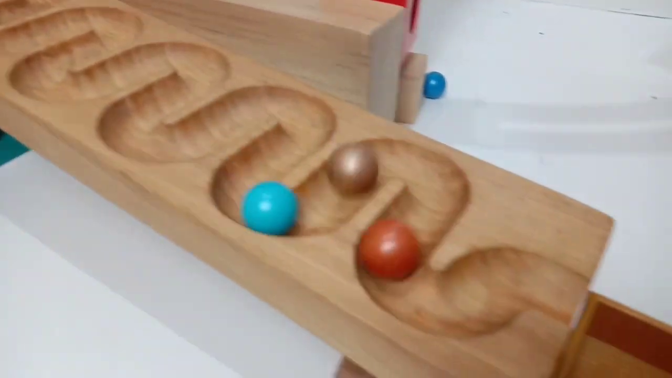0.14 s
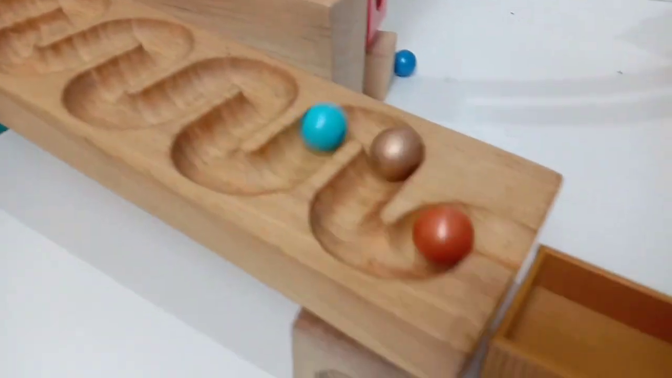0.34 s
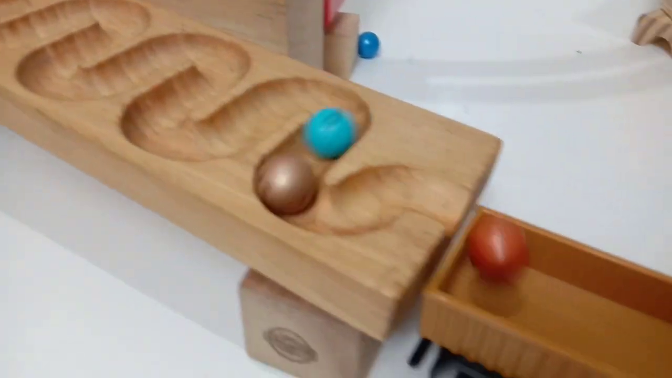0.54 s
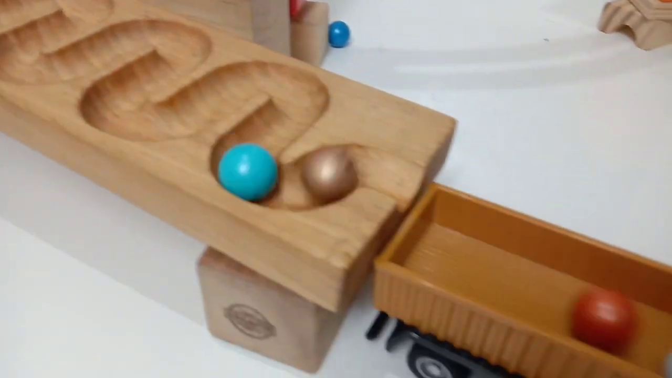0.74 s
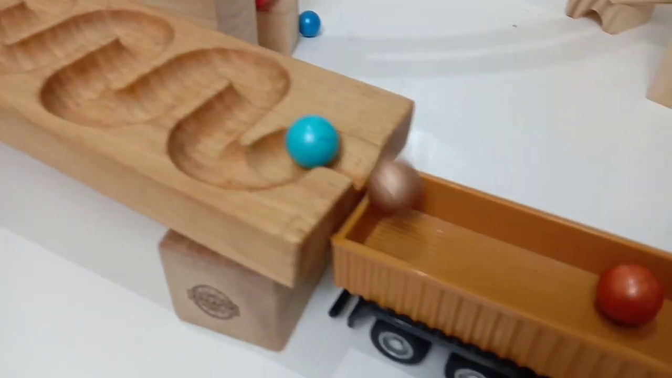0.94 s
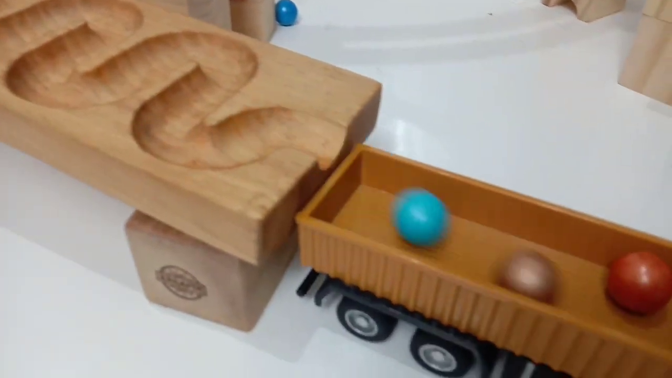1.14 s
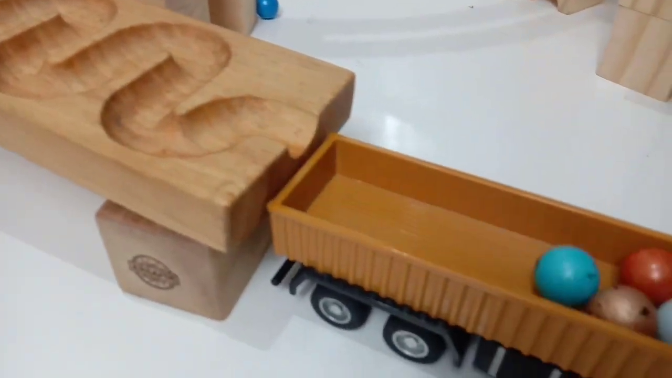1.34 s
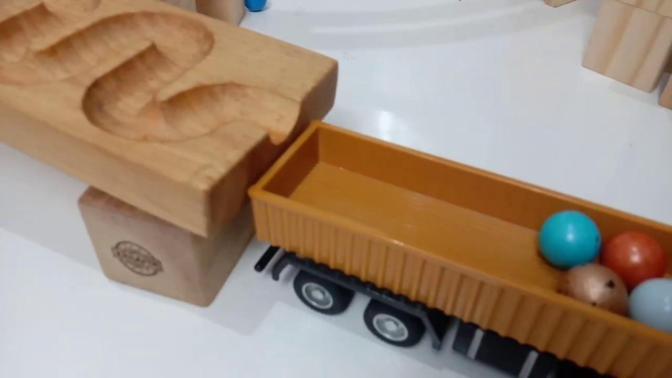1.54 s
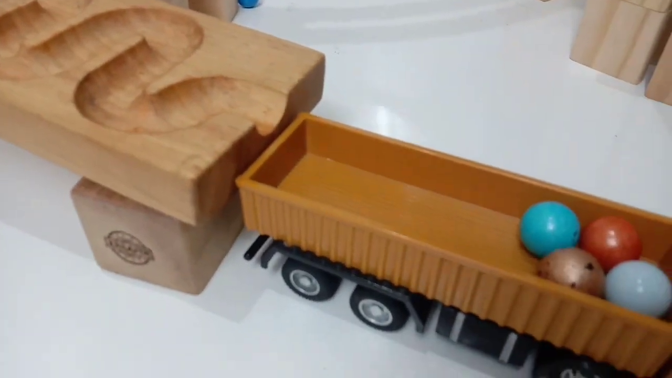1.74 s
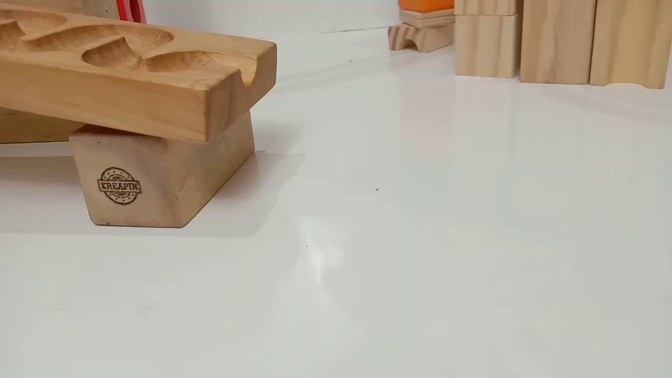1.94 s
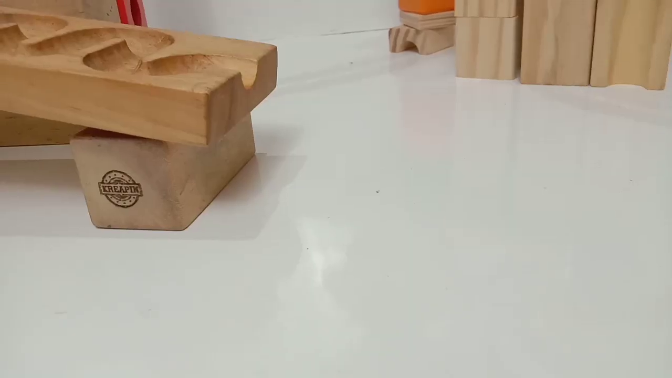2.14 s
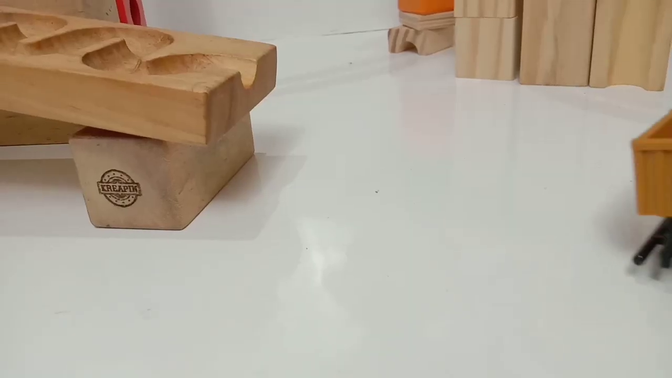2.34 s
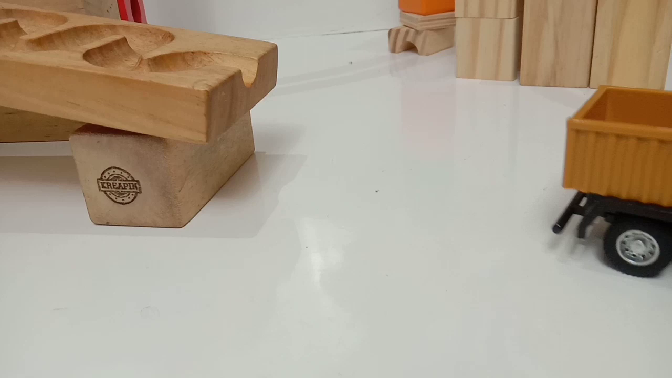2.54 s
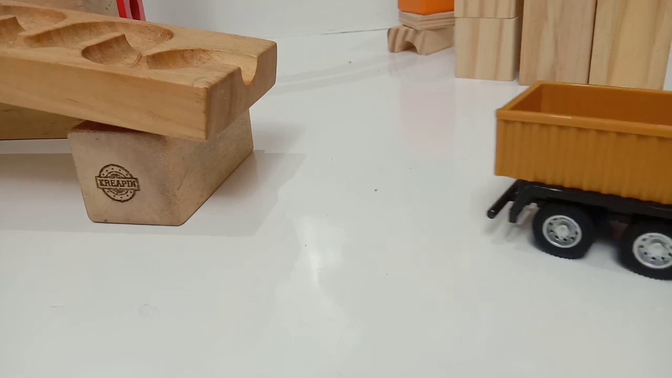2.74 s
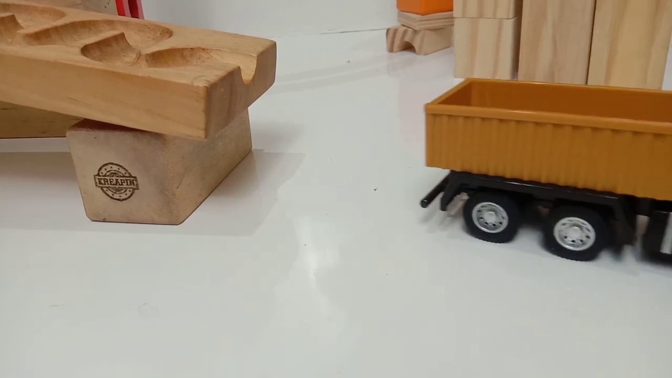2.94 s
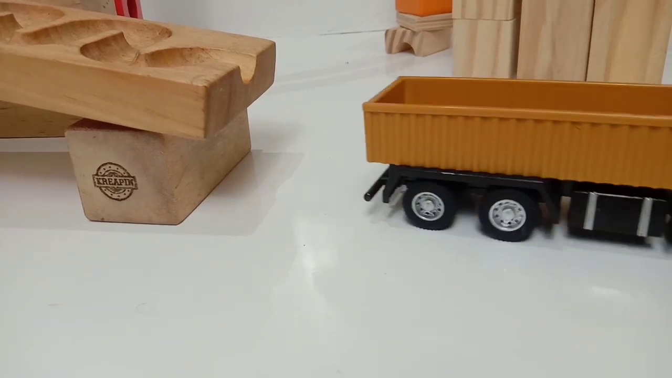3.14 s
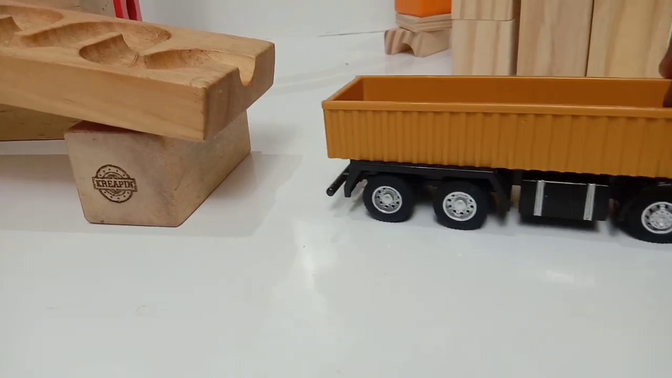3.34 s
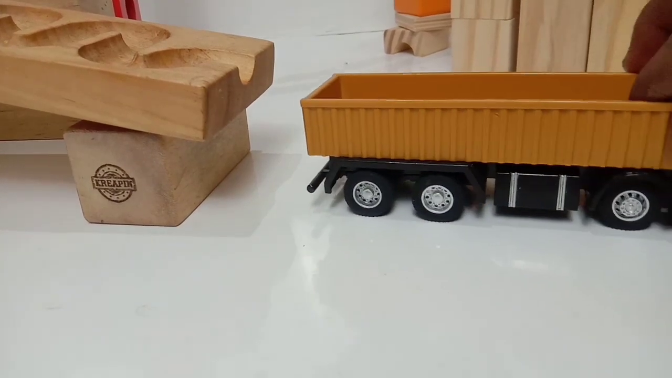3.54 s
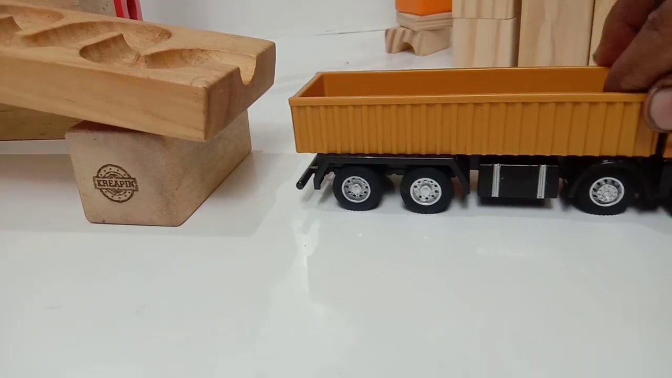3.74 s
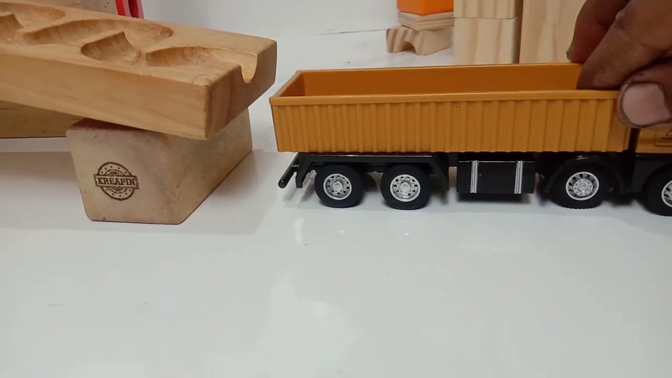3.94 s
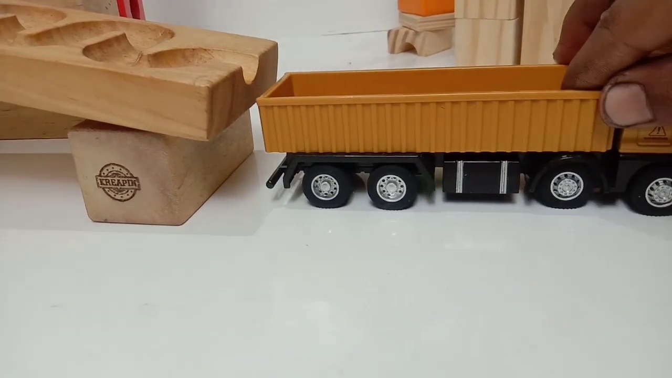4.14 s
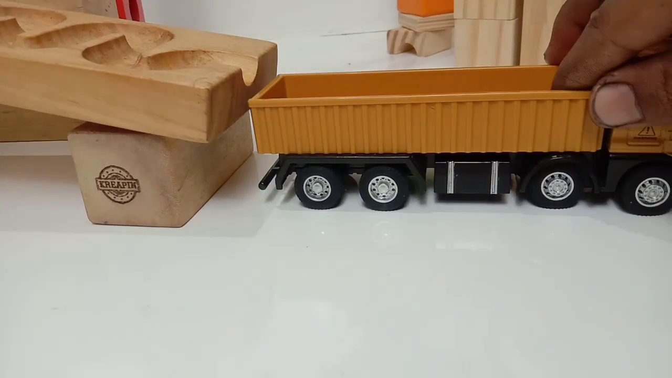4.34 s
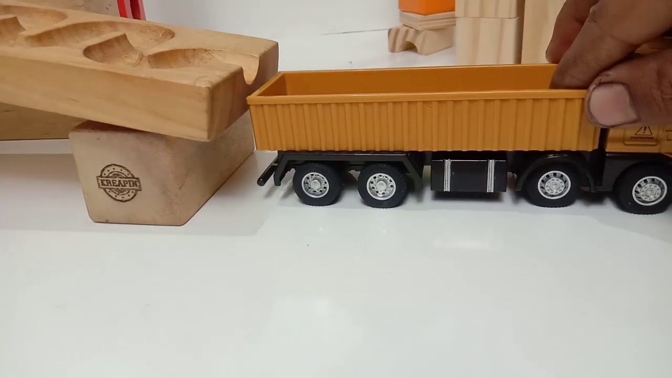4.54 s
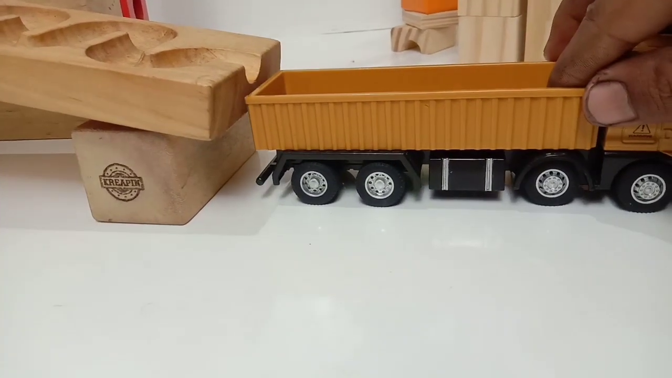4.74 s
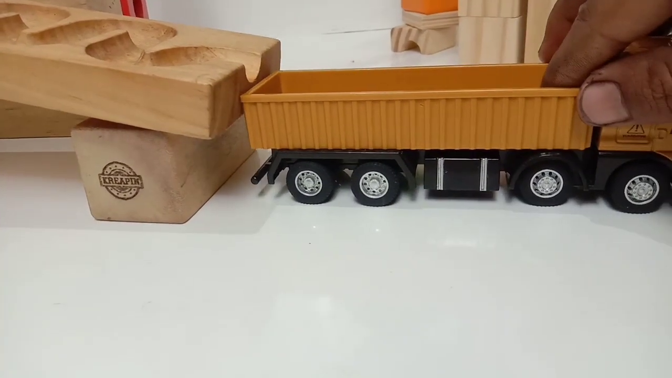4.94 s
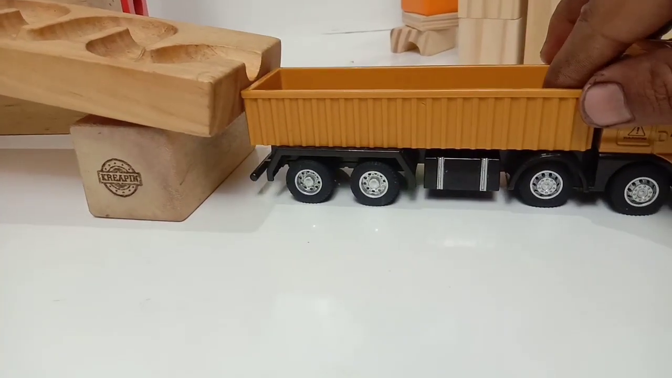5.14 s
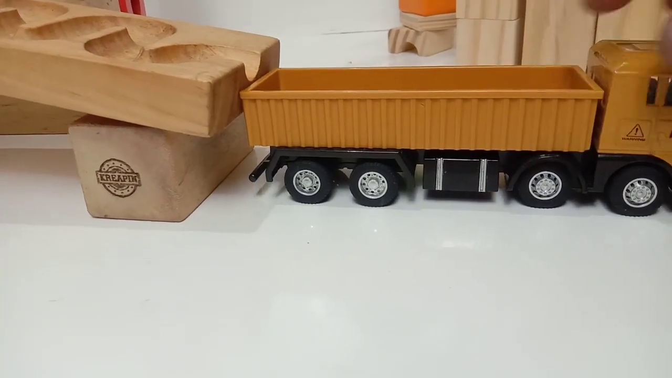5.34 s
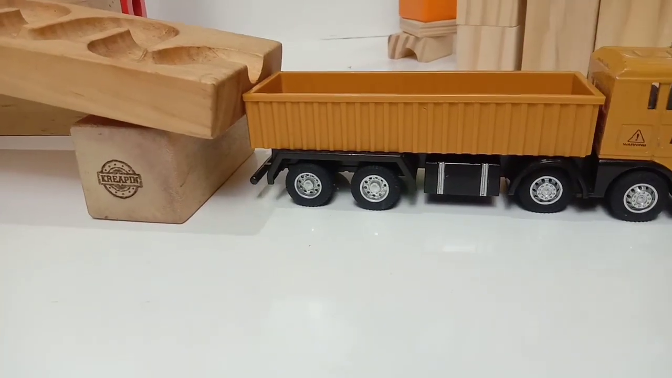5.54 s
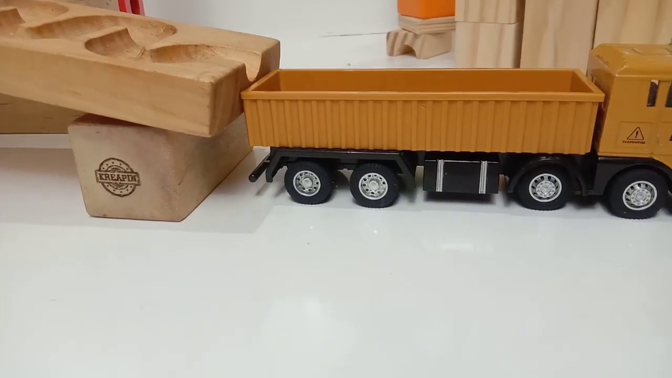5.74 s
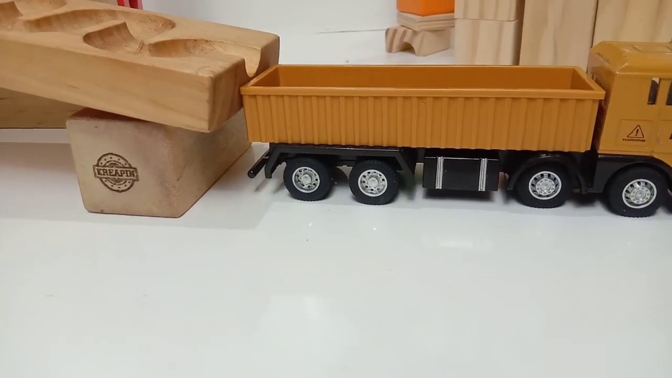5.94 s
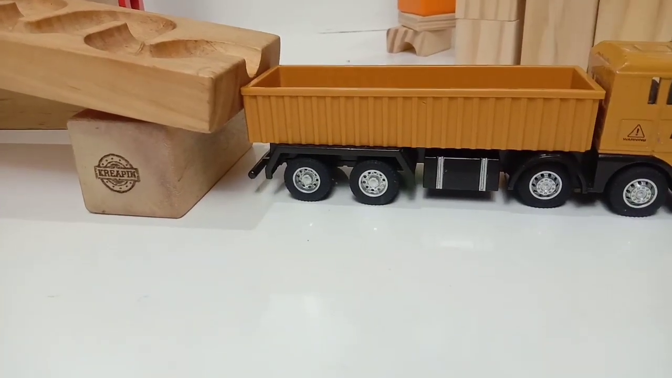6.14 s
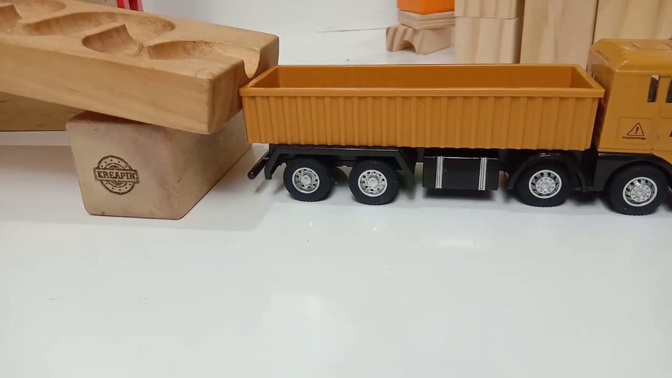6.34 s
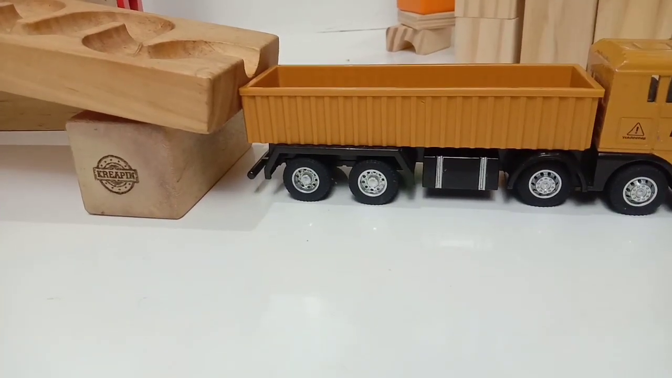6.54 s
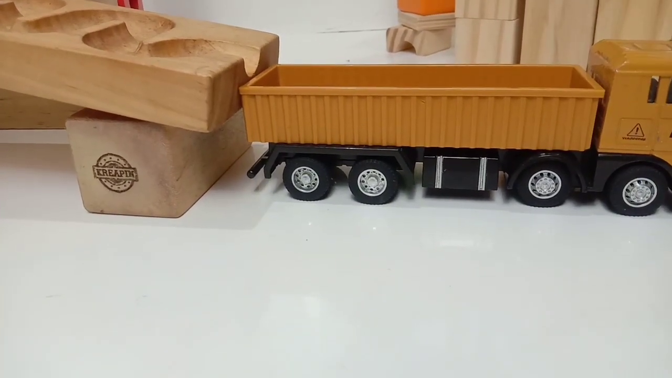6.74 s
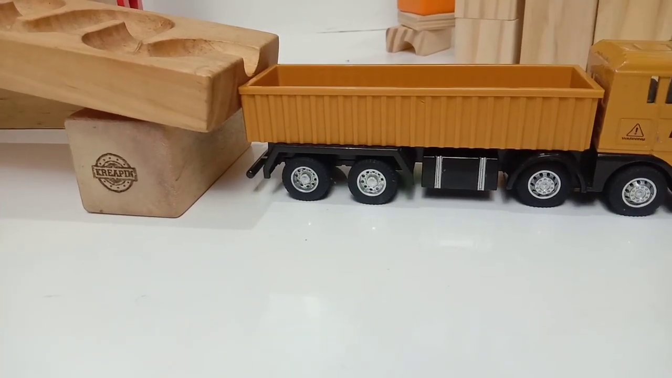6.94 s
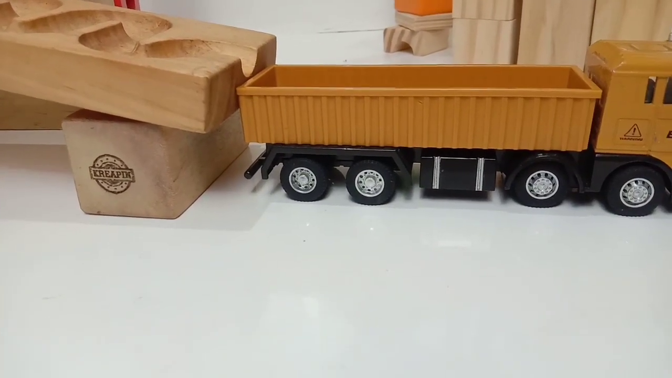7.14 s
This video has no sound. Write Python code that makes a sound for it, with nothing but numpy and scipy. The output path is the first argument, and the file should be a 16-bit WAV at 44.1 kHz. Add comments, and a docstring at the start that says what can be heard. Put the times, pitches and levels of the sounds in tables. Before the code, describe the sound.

Marbles roll down a winding wooden track with a hollow rumble and drop one after another into a plastic toy trailer, clacking and bouncing. After a short silence, the toy truck is set down on a table with rattling knocks and wheeled briefly. Faint ticks and a few dull hand bumps follow, then a quick cluster of sharp plastic clicks. The sounds are close, in a small, slightly echoing room.

```python
"""A table in a small, reverberant room. Marbles rumble down a winding wooden track, exciting the modes of the
board, and drop into the plastic trailer of a toy truck, where they ping, bounce and clack. The sound drops out
for a moment; then the truck is set down, wheeled back and handled: its loose parts rattle, and its hollow body
and the table resonate. A limiter ducks around the hardest clacks, so that their echoes swell up afterwards."""
import sys
import numpy as np
from scipy import signal
from scipy.fft import rfft, irfft, next_fast_len
from scipy.io import wavfile
from scipy.ndimage import map_coordinates

SR = 44100
rng = np.random.default_rng(int(sys.argv[2]) if len(sys.argv) > 2 else 0)


def int16_out(signal):
    """Quantize to a 16-bit WAV file."""
    q = np.round(np.clip(np.atleast_2d(signal).T, -1, 1) * 32767)
    wavfile.write(sys.argv[1], SR, q.astype(np.int16))


N = 317520

# reverberation time of the room: f/Hz, t60/s
ROOM_DECAY = [(100, 0.8), (500, 0.55), (2000, 0.28), (6000, 0.31), (9000, 0.24), (15000, 0.2)]
# spectral envelopes: f/Hz, level/dB
AIR_SPECTRUM = [(15, -67.5), (25, -35), (82, -3.5), (180, -5), (212, -7.5), (335, -13), (427, -13.5),
                (463, -15.5), (677, -27), (1020, -21.5), (1100, -20), (1440, -25.5), (3520, -29.5),
                (3920, -30.5), (16000, -44.5)]  # room hum and hiss
TYRE_SPECTRUM = [(59, -46), (100, 9), (147, -12.5), (365, -21), (406, -8), (583, -17.5), (950, -5.5),
                 (2520, -12.5), (5080, -6), (7140, -22.5), (9020, -66), (16000, -56.5)]  # tyres on the table
THUD_SPECTRUM = [(60, -34), (200, 0), (380, 3.5), (800, -10), (1400, -19.5), (3000, -32), (8000, -30.5),
                 (15000, -57.5)]  # a soft hand
SNAP_SPECTRUM = [(100, -24), (400, -9), (1200, -7.5), (2800, -5), (3700, -1), (5500, -3.5), (7400, 3.5),
                 (8800, -11.5), (11000, -18.5), (13600, -33.5), (14800, -15.5), (15500, -29)]  # plastic on plastic
CHATTER_SPECTRUM = [(100, -18.5), (400, -6), (1000, -10.5), (1700, 5.5), (2600, 1), (3800, 7.5),
                    (5500, -10), (7400, 2), (8600, -13.5), (11000, -22.5), (13800, -27.5), (15300, -12.5)]  # the shaken trailer
MARBLE_SPECTRUM = [(100, -22.5), (500, -3), (1000, -7), (1700, 2.5), (2700, -1.5), (4200, 6.5),
                   (5500, -3.5), (7400, 2.5), (8600, -12), (11000, -18.5), (13800, -21), (15300, -11)]  # a marble's hard contact
# normal modes: f/Hz, level/dB, t60/s
TABLE_MODES = [(86, -3.5, 0.42), (112.4, 0, 0.39), (135, -7.5, 0.19), (179, 2, .35), (237.4, -6.5, 0.26),
               (293, -10.5, 0.24)]  # table top
BODY_MODES = [(342, -17, 0.12), (412, -12.5, 0.13), (729, -9, 0.06), (887, -12.5, 0.056),
              (1030, -16, 0.043), (1233.6, -1.5, 0.07), (1270, -2.5, 0.11), (1370, -5.5, 0.044),
              (1640, -7.5, 0.04), (1753, -10, 0.051), (2049, -8, 0.1), (2307, -1.5, 0.013)]  # hollow truck body
CHASSIS_MODES = [(2923, -14, 0.2), (3420, 5.5, 0.063), (4640, -4.5, 0.096), (4540, 3, 0.15),
                 (5750, 1, 0.058), (6150, -4, 0.053), (6860, 2.5, 0.047), (7150, 7.5, 0.047),
                 (9200, -7, 0.048), (9600, -8, 0.025), (9770, -8.5, 0.035), (11700, -29, 0.049),
                 (14730, -19, .07)]  # chassis and steel axles
TRAILER_MODES = [(2840, -11, 0.24), (3290, 2.5, 0.054), (3660, -10, 0.083), (4000, -3.5, 0.1335),
                 (4340, 1.5, 0.13), (5660, -10, .06), (6160, -6.5, 0.03), (6860, -13.5, .12),
                 (7800, 2, 0.034), (6900, -8, .14), (7340, -11, 0.082), (10370, -28, 0.033)]  # trailer's shell
# modes of a small loose part: ratio to its pitch, level/dB, t60/s
PART_MODES = [(.66, -12, .05), (1, 5.5, 0.037), (1.38, -3, 0.051), (1.681, -10, 0.042)]
# a harder knock is a shorter contact and rings higher: level/dB, f/Hz
KNOCK_PITCH = [(-33, 3520), (-18, 5300)]
# resonances of the wooden track: f/Hz, bandwidth/Hz, level/dB
BOARD_MODES = [(192.6, 24, -7.5), (286, 84, -8), (407, 14, -1), (598.5, 170, -13), (695, 40, -0.5),
               (726, 15, -1), (796, 35, -4), (1000, 200, -16.5), (1242, 38, -5.5), (1500, 120, -12.5),
               (1629, 50, -5), (1850, 150, -16), (2678, 440, -21.5)]

# wheels and axles running on the table: t/s, level/dB
WHEEL_LEVELS = [(1.93, -90.5), (2.11, -54.5), (2.43, -51), (2.63, -54.5), (3.13, -50.5), (3.32, -71.5),
                (3.72, -67), (3.93, -83), (5.5, -86.5)]
# fingers and tyres rubbing: centre t/s, duration/s, level/dB, f/Hz, relative bandwidth
SCUFFS = [(2.954, 0.021, -50.5, 1760, 0.92), (3.715, 0.039, -58.5, 563, 1), (4.188, .1, -72.5, 610, .7),
          (4.915, 0.031, -55.5, 991, 1), (6.325, 0.073, -45.5, 368, 0.46),
          (7.012, 0.05, -64.5, 9500, 0.032)]
# a hand bumping truck and table: t/s, level/dB, relative level of the upper thud/dB
HAND_BUMPS = [(5.1, -50, -4.5), (5.265, -42, -14), (5.633, -33.5, -3), (5.655, -38.5, 2), (5.703, -38.5, 0),
              (5.97, -51.5, 0.5), (7.003, -43.5, 12.5)]
# plastic parts snapping together: t/s, level/dB, relative body level/dB, body f/Hz, top treble gain/dB
KNOCKS = [(1.923, -25.5, -17.5, 1980, -2.5), (2.067, -39, -17.5, 1310, 2.5), (2.103, -43.5, -6.5, 1410, 3),
          (2.1796, -37.5, -23, 1410, 6.5), (2.219, -14, -7.5, 1275, -3), (2.339, -43.5, 7.5, 1400, -3),
          (2.363, -19.5, -9.5, 1360, 1.5), (2.511, -14.5, -3.5, 1323, -2.5), (2.882, -45.5, -0.5, 1040, -9),
          (3.015, -34.5, -2, 1930, -5), (3.119, -24.5, -2.5, 2050, -3), (3.258, -32.5, -5.5, 1266, -13),
          (3.514, -51.5, 4, 1246, -8), (3.538, -39.5, -3, 1500, -4), (3.6, -41.5, -0.5, 1860, -11),
          (3.767, -36.5, -3, 1496, -7.5), (3.919, -66, 9, 1592, -12.5), (4.555, -60, -5, 1252, -18),
          (4.762, -55.5, 0.5, 1400, 15.5), (4.87, -44.5, -6.5, 1300, 9), (4.904, -47.5, 2.5, 1240, -9),
          (5.106, -67.5, 14, 2150, -15), (5.188, -69, 12.5, 2030, -19), (6.158, -40.5, 6, 1203, -29.5),
          (6.279, -48, 4, 1690, -12), (6.293, -31, 3, 1240, -17), (6.35, -31.5, -2.5, 1200, -6),
          (6.362, -30, -2.5, 1500, -12.5), (6.379, -27, -2.5, 1405, -6.5), (6.436, -10.5, -32.5, 1460, 1.5),
          (6.446, -27.5, 0.5, 1230, 2), (6.467, -18.5, -10.5, 1270, 2.5), (6.488, -9, -11.5, 1202, 2),
          (6.502, -22.5, -3, 1170, 3.5), (6.538, -9.5, -10.5, 1270, 3), (6.58, -33, 0.5, 1290, 1.5),
          (6.616, -23.5, -7, 2290, 6), (6.712, -43, 4, 2300, 2), (6.797, -29.5, 4, 1420, 3),
          (6.807, -18, -4, 1170, 2), (6.856, -26.5, -3, 1490, -8.5), (7.004, -46.5, 6.5, 1305, 3)]
# the truck dropping onto its wheels: t/s, level/dB, loss per rebound/dB, thump level/dB, favoured f/Hz
SETTLES = [(1.944, -35, 2, -37.5, 110), (2.232, -38.5, 9, -38, 169), (2.377, -23, 3.5, -23, 110),
           (2.545, -31.5, 6, -29.5, 130), (3.142, -26.5, 3, -27, 194), (3.609, -33.5, 19, -47.5, 200),
           (4.886, -53.5, 7, -55, 230)]
# rolling in the groove, dying away as the marbles leave it: t/s, level/dB
ROLL_LEVELS = [(0.0, -33), (0.276, -36.5), (0.452, -38), (0.872, -40), (1.14, -47), (1.222, -52),
               (1.34, -69.5), (1.642, -77), (1.75, -81)]
# marbles striking the bends: t/s, level/dB
BEND_BUMPS = [(.317, -18), (.365, -19.5), (.415, -16.5), (.426, -16.5), (.686, -21.5), (0.797, -20.5),
              (0.811, -23), (.866, -21.5), (.894, -18.5), (1.524, -36.5)]
# marbles colliding: t/s, level/dB, brightest f/Hz, relative shaking of trailer and table/dB
CLACKS = [(0.2313, -37.5, 5000, -9.5), (0.2713, -7.5, 6870, -16), (.757, -17, 7200, -27),
          (.785, -20.5, 5040, -15.5), (1.27, -24, 6130, -16), (1.274, -14.5, 6000, -13),
          (1.311, -9, 6630, -20), (1.4772, -41.5, 6430, -23.5), (1.548, -37.5, 3840, -14.5)]
# marbles falling into the trailer: landing t/s, level/dB, fall from the rim/s, first flight/s
DROPS = [(-.04, -2, .04, 0.041), (.579, 0, 0.041, .044), (.963, -1, .039, 0.044),
         (1.0973, -1, 0.039, 0.034)]

RING_S = .45  # longest ring of one blow
SILENCE_S, TOP_HZ = (1.81, 1.921), 15550


def amp(db):
    """Amplitude ratio of a level in decibels."""
    return 10 ** (np.asarray(db) / 20)


def unit(x):
    """Normalisation to rms 1."""
    return x / np.sqrt(np.mean(x ** 2) + 1e-20)


def blow(x):
    """Normalisation to the energy of 3 ms at rms 1."""
    return x / np.linalg.norm(x) * np.sqrt(.003 * SR)


def along(points, hz):
    """Interpolation of (f/Hz, value) points on a log-frequency axis."""
    f, v = np.transpose(points)
    return np.interp(np.log(hz + 1), np.log(f + 1), v)


def peak(hz, centre_hz, octaves):
    """Gaussian bell of height 1 on a log-frequency axis."""
    return np.exp(-(np.log2((hz + 1) / centre_hz) / octaves) ** 2)


def envelope(rows):
    """Amplitude envelope through (t/s, level/dB) points."""
    return amp(np.interp(np.arange(N) / SR, *np.transpose(rows)))


def wobble(rate):
    """Random modulation: a spline through `rate` knots a second."""
    knots = rng.standard_normal(int(N * rate / SR) + 4)
    return map_coordinates(knots, [np.arange(0, N, 64) * rate / SR]).repeat(64)[:N]


def age():
    """Time since a blow, t/s."""
    return np.arange(int(RING_S * SR)) / SR


def add(track, s, x):
    """Superposition of x on the track at time s, which may be negative."""
    start = round(s * SR)
    x = x[max(-start, 0):N - start]
    track[max(start, 0):][:len(x)] += x


def coloured(x, gain):
    """Minimum-phase filtering: folding the cepstrum gives a causal response of magnitude gain(f)."""
    size = 2 * next_fast_len(len(x) // 2 + 2048)
    magnitude = np.maximum(gain(np.fft.rfftfreq(size, 1 / SR)), 1e-6)
    cepstrum = irfft(np.log(magnitude))
    cepstrum[1:size // 2] *= 2
    cepstrum[size // 2 + 1:] = 0
    return irfft(rfft(x, size) * np.exp(rfft(cepstrum)))[:len(x)]


def shaped(x, spectrum):
    """Source and filter: x takes on a spectral envelope of (f/Hz, level/dB) points."""
    return coloured(x, lambda hz: amp(along(spectrum, hz)))


def burst(t60, rise=.0001):
    """Broadband transient: noise that builds up and decays exponentially."""
    t = age()
    return blow(rng.standard_normal(len(t)) * amp(-60 * t / t60) * (1 - np.exp(-t / rise)))


def ring(modes, scatter_db=0):
    """Free vibration: a sum of damped modes with random signs and scattered strengths."""
    t = age()
    hz, db, t60 = np.transpose(modes)[:, :, None]
    strength = amp(db + scatter_db * rng.standard_normal(db.shape)) * rng.choice([-1, 1], db.shape)
    return blow(np.sum(strength * amp(-60 * t / t60) * np.sin(2 * np.pi * hz * t), axis=0))


def grains(rate, spread_db):
    """Poisson process: tiny impacts of uneven size, on average `rate` a second."""
    impulses = (rng.random(N) < rate / SR) * rng.choice([-1, 1], N)
    return impulses * amp(spread_db * np.clip(rng.standard_normal(N), -2, 2))


def in_room(x, wet_db):
    """Reverberation: a diffuse tail in which each frequency decays at its own rate."""
    t = age()
    hz, s, noise = signal.stft(rng.standard_normal(len(t)), SR, nperseg=256)
    decay = amp(-60 * s / along(ROOM_DECAY, hz)[:, None])
    tail = signal.istft(noise * decay, SR, nperseg=256)[1][:len(t)]
    tail *= 1 - np.exp(-t / 0.0056)  # the walls take a moment to answer
    return x + amp(wet_db) * signal.fftconvolve(x, tail / np.linalg.norm(tail))[:len(x)]


def air():
    """Stationary noise: the quiet hum and hiss of the room."""
    return amp(-67.5) * unit(shaped(rng.standard_normal(N), AIR_SPECTRUM))


def wheels():
    """Rolling noise: tyres hiss and axles tick, driving the truck's body and the table."""
    hiss = unit(shaped(grains(rate=3000, spread_db=6), TYRE_SPECTRUM))
    axle_gain = lambda hz: amp(along(SNAP_SPECTRUM, hz) + 10 * peak(hz, 5000, 0.92))
    ticks = unit(coloured(grains(rate=100, spread_db=5), axle_gain))
    body_gain = lambda hz: amp(-30 + 32 * peak(hz, 2700, 1.5))
    rattle = unit(coloured(grains(rate=250, spread_db=4.5), body_gain))
    drone = unit(signal.fftconvolve(grains(rate=200, spread_db=0), ring(TABLE_MODES))[:N])
    uneven = amp(2.5 * wobble(rate=43))
    rolling = amp(-3.5) * hiss + uneven * (amp(-6.5) * ticks + amp(-8.5) * rattle) + amp(-9.5) * drone
    return in_room(rolling * envelope(WHEEL_LEVELS), wet_db=-8)


def rubbing():
    """Stick-slip friction: rubbed surfaces release fine grains of sound that swell and fade."""
    track, t = np.zeros(N), age() - RING_S / 2
    for s, duration, db, centre_hz, width in SCUFFS:
        slips = rng.standard_normal(len(t)) * amp(8.7 * rng.standard_normal(len(t)))
        rub = unit(coloured(slips, lambda hz: amp(40 * peak(hz, centre_hz, 2 * width))))
        add(track, s - RING_S / 2, amp(db) * rub * np.exp(-2 * (t / duration) ** 2))
    return in_room(track, wet_db=-7)


def hand():
    """Compliant impact: soft flesh gives a dull thud and excites the low modes of the table."""
    track = np.zeros(N)
    for s, db, upper_db in HAND_BUMPS:
        thud = blow(shaped(burst(t60=0.15), THUD_SPECTRUM))
        table = ring(TABLE_MODES, scatter_db=2.5)
        add(track, s, amp(db) * in_room(table + amp(upper_db) * thud, wet_db=-9.5))
    return track


def table_thump(favoured_hz):
    """Modal excitation: the spot struck favours some modes, and the heavy top swings up gradually."""
    modes = [(hz, db + 4.5 * peak(hz, favoured_hz, .5), t60) for hz, db, t60 in TABLE_MODES]
    swing = blow(ring(modes, scatter_db=5.5) * (1 - np.exp(-age() / .012)))
    return in_room(swing, wet_db=-11)


def knock(db, hollow_db, body_hz, treble_db):
    """Impact excitation: a loose plastic part snaps and ticks on; chassis and body resonate."""
    t = age()
    pitch_hz = np.interp(db, *np.transpose(KNOCK_PITCH)) * 2 ** (.07 * rng.standard_normal())
    # only sharp edges reach the top treble
    colour_db = lambda hz: along(SNAP_SPECTRUM, hz) + treble_db * np.clip((hz - 6500) / 3500, 0, 1)
    ticks_per_s, ticks_t60 = 250, 0.19
    ticks = (rng.random(len(t)) < ticks_per_s / SR) * rng.standard_normal(len(t))
    ticks *= amp(-60 * t / ticks_t60)
    loose = blow(signal.fftconvolve(ticks, burst(t60=0.0074))[:len(t)])
    contact = burst(t60=0.0078, rise=0.00044) + amp(-1.5) * burst(t60=0.018, rise=0.0025)
    snap = blow(coloured(contact + amp(-11) * loose, lambda hz: amp(colour_db(hz))))
    modes = [(k * pitch_hz, level + colour_db(k * pitch_hz), t60) for k, level, t60 in PART_MODES]
    part = ring(modes, scatter_db=3)
    hollow = blow(coloured(burst(t60=0.036, rise=0.002), lambda hz: amp(50 * peak(hz, body_hz, 1.6))))
    body = amp(-0.5) * ring(BODY_MODES, scatter_db=6) + amp(-1) * hollow
    body += amp(-2.5) * ring([(body_hz, 0, .03)])
    chassis = ring(CHASSIS_MODES, scatter_db=6)
    direct = snap + amp(-6.5) * part + amp(-12.5) * chassis + amp(hollow_db) * body
    return amp(db) * in_room(direct, wet_db=-9)


def truck():
    """Impact and rebound: the handled truck knocks; set down, it thumps the table and judders."""
    track = np.zeros(N)
    graze_lead_s, rebound_s = 0.0026, .017
    for s, db, hollow_db, body_hz, treble_db in KNOCKS:
        graze = blow(shaped(burst(t60=0.013, rise=0.00059), SNAP_SPECTRUM))
        add(track, s - graze_lead_s, amp(db - 16) * graze)
        add(track, s, knock(db, hollow_db, body_hz, treble_db))
    for s, db, loss_db, thump_db, favoured_hz in SETTLES:
        add(track, s, amp(thump_db) * table_thump(favoured_hz))
        for k in range(5):
            rebound = knock(db - k * loss_db, hollow_db=-1, body_hz=1433, treble_db=-7.5)
            add(track, s + k * rebound_s * (1 + .04 * rng.standard_normal()), rebound)
    return track


def board_gain(hz):
    """Frequency response of the board: its resonances add in power; soft wood absorbs the treble."""
    power = sum(amp(db) ** 2 / (1 + ((hz ** 2 - mode_hz ** 2) / (width * (hz + 1))) ** 2)
                for mode_hz, width, db in BOARD_MODES)
    return np.sqrt(power / (1 + (hz / 3200) ** 4))


def groove():
    """Forced vibration: marbles drive the board as they cross milled ridges and bump into bends."""
    patter = grains(rate=770, spread_db=4)
    rumble = np.zeros(N)
    for k, (hz, width, db) in enumerate(BOARD_MODES):
        mode = signal.lfilter(*signal.iirpeak(hz, hz / width, SR), patter)
        # the travelling marbles cross the mode's nodes and antinodes
        rumble += (-1) ** k * amp(db + 3.5 * wobble(rate=24)) * mode
    rumble = unit(signal.sosfilt(signal.butter(2, 2800, fs=SR, output="sos"), rumble))
    track = rumble * envelope(ROLL_LEVELS)
    for s, db in BEND_BUMPS:
        add(track, s, amp(db) * blow(coloured(burst(t60=0.043, rise=0.0087), board_gain)))
    return in_room(track, wet_db=-10.5)


def marble_hit(bright_hz, shake_db):
    """Hard impact: a short contact pings, makes the trailer chatter and thumps the table."""
    t = age()

    def contact_gain(hz):
        """A small ball radiates little below its ping; the contact time limits the treble."""
        radiation = 0.42 + 1 / (1 + (0.82 * bright_hz / (hz + 1)) ** 14)
        rolloff = 1 + (hz / (2.8 * bright_hz)) ** 4
        return amp(along(MARBLE_SPECTRUM, hz) + 5 * peak(hz, bright_hz, 0.28)) * radiation / rolloff

    contact = burst(t60=0.0083) + amp(-0.5) * burst(t60=0.029, rise=0.0012)
    ping = ring([(0.83 * bright_hz, 0, 0.018)])
    clack = blow(coloured(contact, contact_gain)) + amp(-10) * ping + amp(-12.5) * ring(TRAILER_MODES)
    noise = rng.standard_normal(len(t))
    flicker_db = 7 * rng.uniform(-1, 1, len(t) // 64 + 1).repeat(64)[:len(t)]
    rebounds = noise * amp(flicker_db - 60 * t / 0.33) * (1 - np.exp(-t / 0.0037))
    chatter = blow(shaped(rebounds, CHATTER_SPECTRUM))
    table = ring(TABLE_MODES, scatter_db=2.5)
    body = ring(BODY_MODES, scatter_db=5.5)
    shake = amp(-1.5) * table + amp(4.5) * chatter + amp(-4) * body
    return in_room(clack + amp(shake_db) * shake, wet_db=-11.5)


def marbles():
    """Inelastic collisions: each marble clips the rim, lands and bounces twice; marbles meet and clack."""
    track = np.zeros(N)
    restitution, loss_db = .42, 5  # per bounce
    for s, db, fall_s, flight_s in DROPS:
        add(track, s - fall_s, amp(db - 13) * marble_hit(bright_hz=4940, shake_db=-25.5))  # rim
        add(track, s, amp(db) * marble_hit(bright_hz=5570, shake_db=-21.5))  # trailer floor
        for k in range(2):
            s += flight_s * restitution ** k
            add(track, s, amp(db - 19 - loss_db * k) * marble_hit(bright_hz=3800, shake_db=-2))
    for s, db, bright_hz, shake_db in CLACKS:
        add(track, s, amp(db) * marble_hit(bright_hz, shake_db))
    return track


def scene():
    """Superposition of all sources in one channel."""
    return (air() + wheels() + rubbing() + hand() + truck() + groove() + marbles())[None]


def limiter(x, ceiling_db, attack_db_per_s, release_db_per_s):
    """Look-ahead limiting: the gain ramps down before each excessive peak and recovers after it."""
    t = np.arange(N) / SR
    excess_db = np.maximum(20 * np.log10(np.abs(x).max(axis=0) + 1e-9) - ceiling_db, 0)
    after = np.maximum.accumulate(excess_db + release_db_per_s * t) - release_db_per_s * t
    before = (np.maximum.accumulate(excess_db[::-1] + attack_db_per_s * t) - attack_db_per_s * t)[::-1]
    return x * amp(-np.maximum(before, after))


def record(dry):
    """Signal chain: microphone bass cut, limiter, a brief dropout and a band limit."""
    t = np.arange(N) / SR
    heard = signal.sosfilt(signal.butter(3, 62, "highpass", fs=SR, output="sos"), dry)
    limited = limiter(heard, ceiling_db=-6, attack_db_per_s=703, release_db_per_s=299.5)
    limited *= (t < SILENCE_S[0]) | (t > SILENCE_S[1])
    passband = np.fft.rfftfreq(2 * N, 1 / SR) < TOP_HZ
    return irfft(rfft(limited, 2 * N) * passband)[:, :N]


dry = scene()
out = record(dry)
int16_out(out)
```